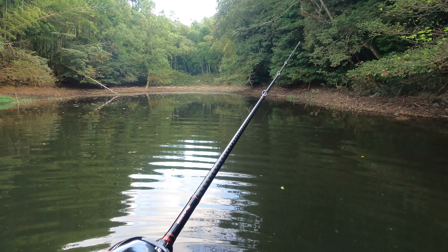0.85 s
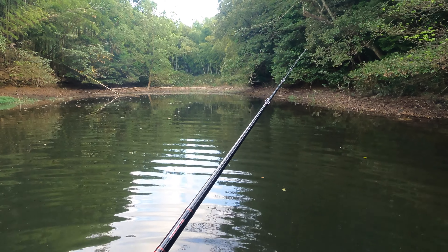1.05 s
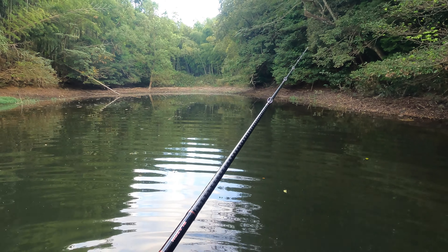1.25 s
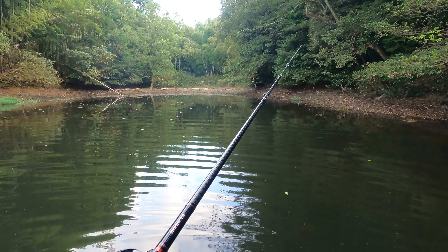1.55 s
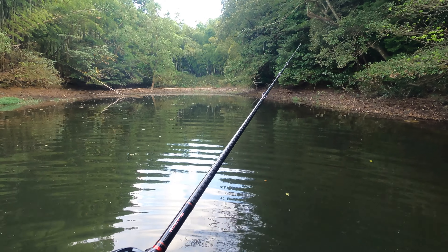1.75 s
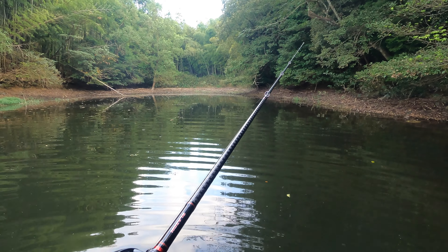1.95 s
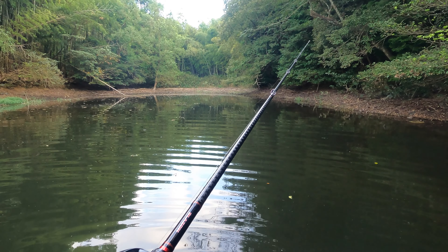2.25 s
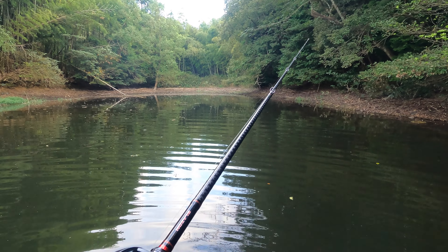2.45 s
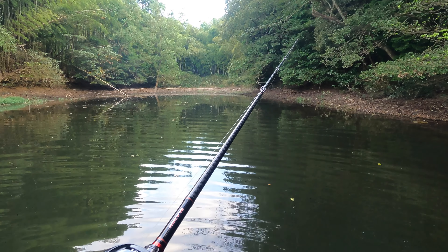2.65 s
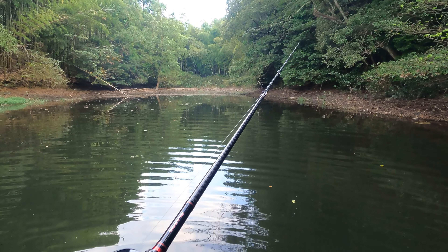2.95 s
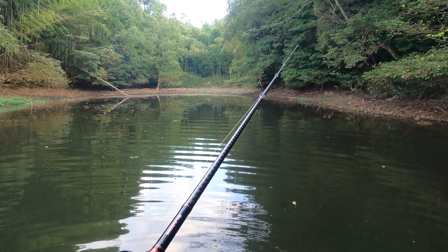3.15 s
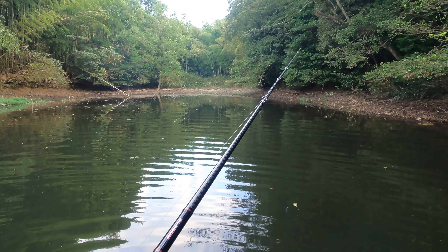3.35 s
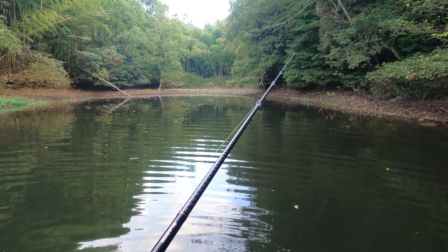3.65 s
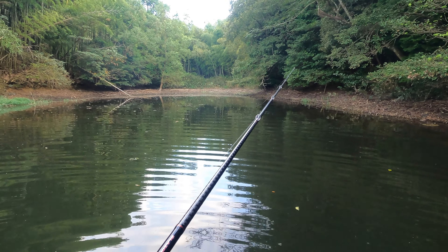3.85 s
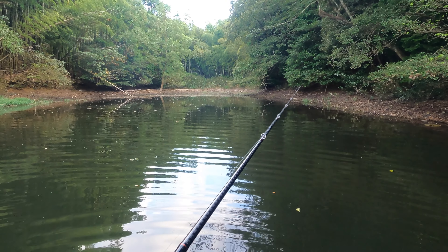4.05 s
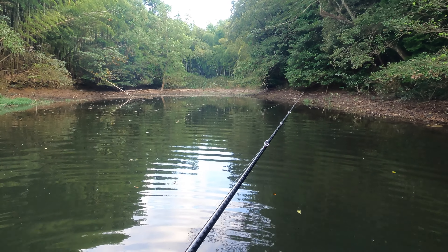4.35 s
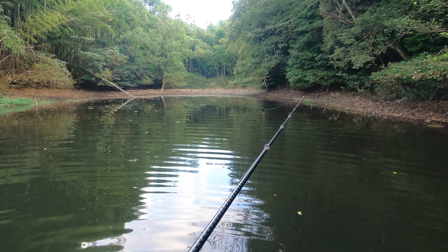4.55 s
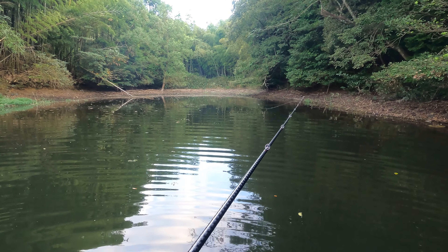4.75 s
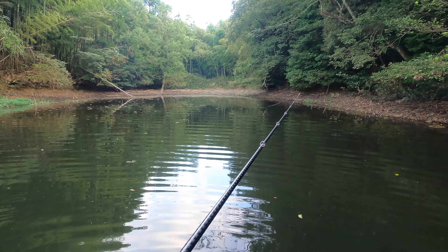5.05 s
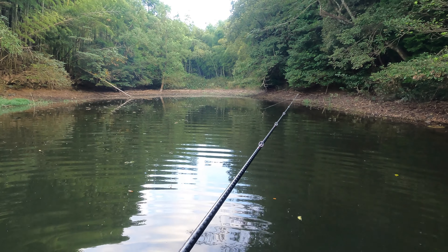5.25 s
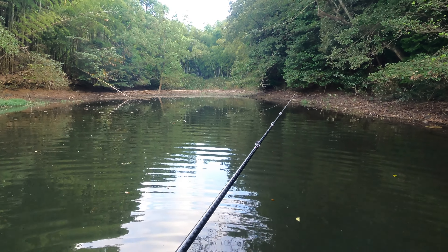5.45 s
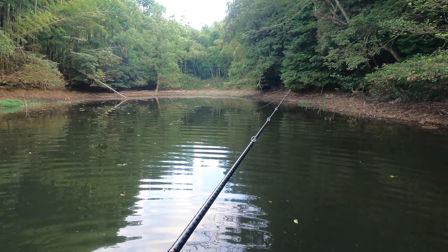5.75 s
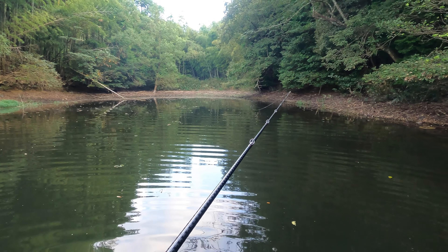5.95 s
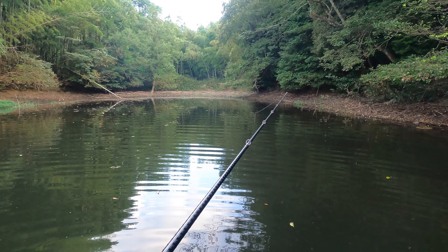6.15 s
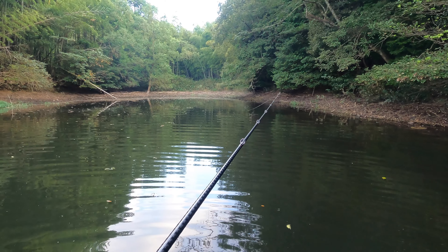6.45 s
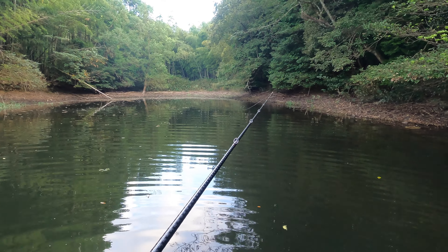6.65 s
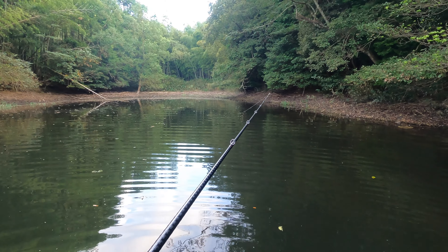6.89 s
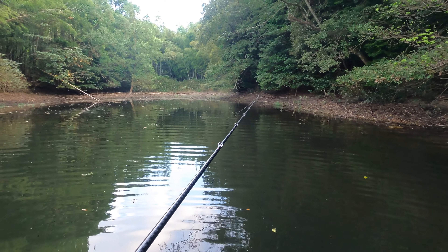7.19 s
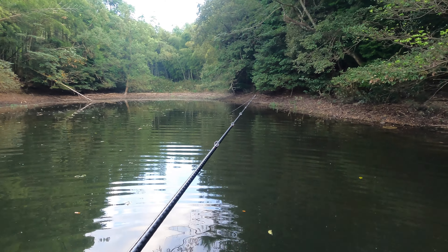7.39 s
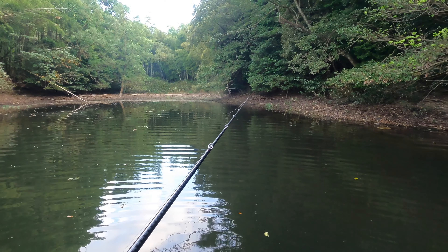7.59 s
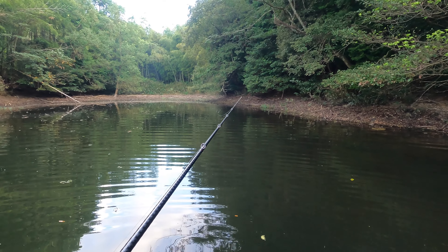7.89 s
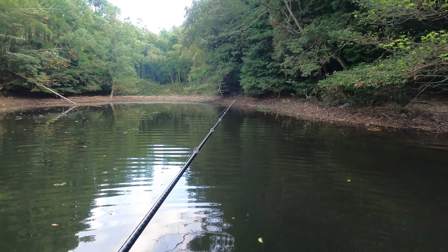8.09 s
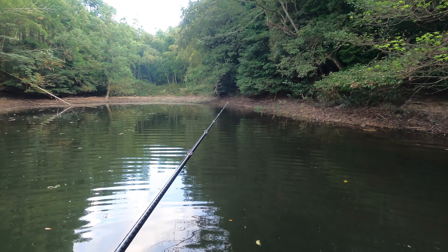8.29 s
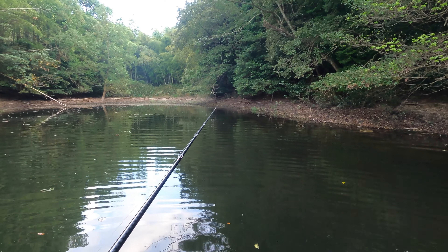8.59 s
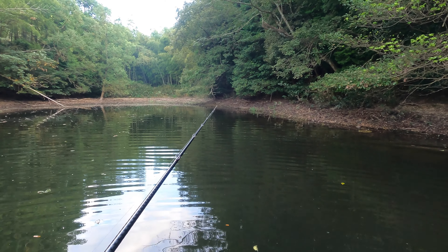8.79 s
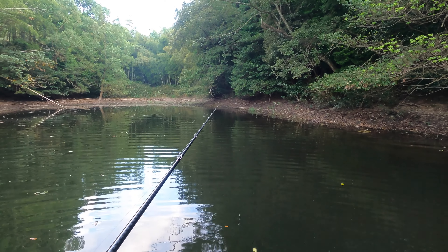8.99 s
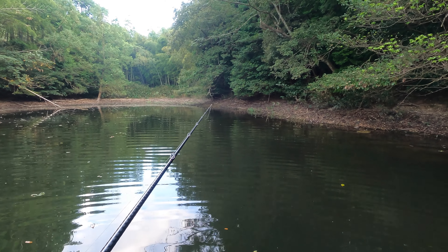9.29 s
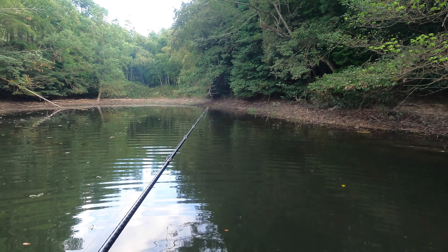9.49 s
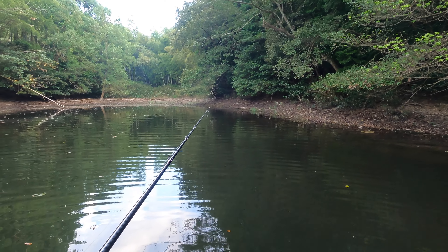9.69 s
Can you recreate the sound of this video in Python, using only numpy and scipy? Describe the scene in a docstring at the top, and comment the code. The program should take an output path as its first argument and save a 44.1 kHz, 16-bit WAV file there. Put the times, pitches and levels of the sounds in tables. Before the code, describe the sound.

Outdoors at a still wooded pond, heard from a stereo microphone beside the tackle. A single bright clack near the start dominates, then everything is quiet: sparse ticking line, delicate ringing plops farther out, and after the middle dry grip creaks with dull low thuds to the left. Thin birdsong, quick falling chirps and hoarse distant cries echo in the trees above a soft steady insect band, low traffic hum and slight wind rumble.

```python
"""Still pond in the woods: a surface lure is wound back. The reel snaps into gear close by as struck, ringing
metal, and scattered echoes return from the trees. The lure's plops are ringing bubbles; wet line ticks and the
creaking, rustling grip are coloured noise bursts. Birds are gliding tones. Insects, traffic, woods and air on
the microphone are coloured noise."""
import sys
import numpy as np
from scipy import signal
from scipy.fft import rfft, irfft, next_fast_len
from scipy.io import wavfile

SR = 44100
rng = np.random.default_rng(int(sys.argv[2]) if len(sys.argv) > 2 else 0)


def to_wav(s):
    """Save 16-bit WAV."""
    ch = np.atleast_2d(s).T  # columns
    pcm = np.round(np.clip(ch, -1, 1) * 32767)  # PCM
    wavfile.write(sys.argv[1], SR, pcm.astype(np.int16))


N = 433503
T = np.arange(N) / SR

# Table levels are relative: layer trims and the microphone ports still act on them.
# clutch strikes and rebounds (time [s], level [dB])
CLACKS = [(.2243, -31), (.2324, -25.5), (.2391, -20), (.2397, -22.5), (.2406, -21), (.2418, -28),
          (.2425, -31), (.2442, -34)]
# lighter gear knocks (time [s], level [dB])
GEARS = [(.068, -52), (.168, -54.5), (.203, -58), (.523, -61), (.602, -48.5), (.605, -52.5), (.654, -60),
         (.835, -64), (1.267, -57.5), (1.781, -63), (2.756, -58.5), (4.046, -56), (4.159, -65), (5.25, -61),
         (5.45, -56), (6.87, -53.5), (8.351, -60.5)]
# housing colour under the clutch (frequency [Hz], gain [dB])
REEL_COLOUR = [(60, -36), (170, -25), (400, -19.5), (650, -10.5), (850, -5), (1250, 1.5), (1700, -6),
               (2500, -0.5), (3400, -2), (4600, 5.5), (5100, 2.5), (5800, 5.5), (6700, 4.5), (8400, -2),
               (10300, -11), (11000, -24), (15000, -33.5)]
# housing colour under the gears (frequency [Hz], gain [dB])
GEAR_COLOUR = [(60, -14), (170, -8), (400, -16), (650, -6), (900, 3.5), (1300, 1), (1750, -3), (2500, -1),
               (3400, -3.5), (5200, 3), (6700, -3), (8400, -9), (11000, -29), (15000, -38.5)]
# ringing of reel and rod (frequency [Hz], level [dB], t60 [s])
REEL_MODES = [(163.5, -26, 0.21), (654, -38, .15), (820, -25, .13), (973, -22.5, 0.17), (1060, -26, 0.09),
              (1330, -17, .02), (1930, -28.5, 0.082), (2500, -16, 0.016), (4670, -9, 0.009),
              (5800, -8.5, 0.012), (6680, -10.5, 0.009)]
# treble-heavy return of the snap from the leaves (frequency [Hz], gain [dB])
THROWN_COLOUR = [(1000, -12.5), (5000, -4.0), (8000, -1.5), (12000, 12.5)]
# tree echo colour (frequency [Hz], gain [dB])
ECHO_COLOUR = [(300, 9.5), (2000, 3.5), (7000, 6.0), (14000, -8.5)]
# gear whirr as the crank turns (time [s], level [dB])
CRANK = [(0, -100), (.55, -73.5), (1.1, -72), (1.5, -70.5), (1.8, -95), (9.83, -96)]
# hollow of the reel (frequency [Hz], gain [dB])
HOLLOW_COLOUR = [(300, -26.0), (650, -6.5), (830, 5.5), (950, 0), (1150, 1.5), (1700, -5), (3000, -18.0),
                 (9000, -38.0)]
# bubbles closed by the lure (time [s], level [dB], starting pitch [Hz], t60 [s])
PLOPS = [(1.597, -61, 2050, 0.042), (1.788, -60, 990, 0.06), (2.201, -59, 2123, 0.011),
         (2.555, -64, 1930, 0.044), (2.605, -63, 1990, 0.027), (2.65, -49.5, 2015, 0.057),
         (3.213, -58, 2160, 0.026), (4.3158, -54, 2360, 0.034), (4.642, -62.5, 2640, 0.03),
         (5.859, -52.5, 2210, 0.035), (6.987, -57.5, 2200, 0.02), (7.0418, -58.5, 2200, 0.031),
         (7.389, -52.5, 1996, 0.055), (8.764, -57, 4500, 0.059), (9.2453, -50, 2010, 0.062)]
# slap of the water (frequency [Hz], gain [dB])
SLAP_COLOUR = [(700, -21), (1900, 14.0), (2600, 2), (5000, -6), (12000, -58)]
# clearest flicks of wet line onto the spool (time [s], level [dB], pitch [Hz])
TICKS = [(1.227, -62, 6350), (1.267, -55, 5920), (1.362, -58, 5910), (2.2535, -64, 7600),
         (2.442, -61.5, 7400), (2.4978, -48.5, 5700), (2.544, -54, 7300), (2.7536, -58.5, 7940),
         (2.869, -65, 8500), (2.91, -57, 8850), (3.1627, -61.5, 7250), (3.217, -66, 8500),
         (3.2628, -58.5, 7500), (3.874, -65, 9050), (4.043, -49.5, 7500), (4.159, -52.5, 5710),
         (4.253, -65, 9460), (4.3704, -60, 8050), (4.623, -59.5, 7500), (4.85, -67, 7940),
         (5.0474, -58, 8360), (5.08, -56.5, 7600), (5.2006, -57, 6700), (5.335, -63, 7500),
         (5.3565, -57, 6900), (5.385, -46.5, 7000), (5.403, -60, 6800), (5.807, -58.5, 6960),
         (6.691, -62, 6500), (6.8686, -65.5, 5550), (7.9825, -60.5, 8300), (8.055, -63, 9000),
         (8.3504, -52, 6200), (8.449, -60.5, 6200), (8.5415, -58.5, 7240), (8.687, -62.5, 8350),
         (8.7652, -58, 8740), (8.959, -62, 7000), (9.128, -63.5, 8000), (9.5513, -63, 6800),
         (9.59, -64, 8400), (9.7282, -55.5, 9300)]
# stick-slip creaks of the grip (time [s], level [dB])
CREAKS = [(5.716, -48.5), (5.757, -47), (5.799, -48), (5.875, -42.5), (5.894, -53), (5.912, -46),
          (5.929, -46), (5.951, -53), (6.047, -53.5), (6.134, -52.5), (6.416, -43.5), (6.441, -46),
          (6.467, -44.5), (6.496, -53), (6.518, -43), (6.536, -45), (6.773, -50), (6.892, -53.5),
          (7.491, -49.5), (7.52, -52), (7.56, -52), (7.604, -53), (7.664, -52.5), (8.083, -48)]
# creak and bump scuff colour (frequency [Hz], gain [dB])
CREAK_COLOUR = [(80, 1), (200, 4.5), (440, 5.5), (660, -16.5), (900, -7.5), (1500, -13), (3000, -19.5),
                (8000, -33.5), (14000, -93)]
# soft bumps of the hand (time [s], level [dB], pitch [Hz])
BUMPS = [(3.927, -51.5, 167), (3.956, -57, 162), (4.845, -58.5, 150), (5.912, -51.5, 186),
         (6.595, -45, 215), (6.648, -49, 206), (6.969, -45.5, 185), (7.022, -49, 210), (7.09, -48.5, 192),
         (7.599, -45.5, 201), (7.921, -55.5, 187), (8.012, -52.5, 153), (8.084, -53, 149)]
# hand shifting on the grip (time [s], level [dB])
RUSTLE = [(0, -100), (5.3, -96), (5.5, -64.5), (5.72, -62), (5.93, -58.5), (6.15, -76), (6.38, -85),
          (6.5, -60), (6.7, -62), (6.85, -72), (7.0, -58), (7.2, -76), (7.45, -76), (7.58, -72),
          (7.75, -85), (8.05, -61.5), (8.25, -83), (8.65, -65), (9.1, -84), (9.83, -79)]
# rustle colour (frequency [Hz], gain [dB])
RUSTLE_COLOUR = [(80, 0.5), (200, 3.5), (440, -6.5), (660, -15.5), (900, -15), (1500, -17), (3000, -18),
                 (8000, -29), (14000, -76.5)]
# small bird's falling three-note phrases (time [s], level [dB], pitch fallen to [Hz])
PHRASES = [(-.04, -63.5, 5670), (0.457, -61.5, 5630), (.95, -62.5, 5800), (2.056, -59, 5950),
           (3.907, -58, 5580), (5.385, -60, 5360), (7.427, -62, 5730), (7.895, -59.5, 5600)]
# thin whistle, buzzing trill, lower hook (delay [s], length [s], share of the fall [0-1], level [dB])
SONG_NOTES = [(0.003, 0.1, 0.053, -15.5), (0.138, 0.16, .4, -8), (0.257, .07, 1, 1)]
# same three notes (pitch contour [ratio], buzz [ratio])
SONG_SHAPES = [([.975, .995, 1, .992], .007),
               ([.95, 1.04, .96, .99], .035),
               ([.86, .955, .97, 1.01, .98, .94], .018)]
# second bird's quick falling chirps (time [s], level [dB])
CHIRPS = [(0.133, -56), (.955, -62), (1.028, -55.5), (1.59, -59.5), (1.672, -56), (2.03, -57), (2.575, -53),
          (2.649, -49), (4.36, -54.5), (4.424, -49), (4.589, -49.5), (4.759, -53), (5.114, -59),
          (6.648, -54.5), (6.721, -55), (7.344, -56.5), (7.581, -57.5), (7.744, -55.5), (7.869, -53.5),
          (9.276, -61), (9.786, -52)]
# larger bird's gliding calls, deep in the trees (time [s], length [s], first [Hz], last [Hz], level [dB])
CRIES = [(5.17, 0.018, 2750, 4230, -61), (5.413, 0.036, 1693, 5480, -58.5), (5.447, 0.072, 4180, 3920, -54),
         (5.504, 0.077, 3670, 2730, -61), (5.665, 0.025, 5100, 5540, -65), (5.688, 0.065, 5400, 4860, -62),
         (5.742, 0.081, 5480, 6950, -65), (5.798, 0.062, 7040, 6860, -63), (5.832, .065, 4870, 1995, -60.5),
         (5.901, 0.054, 2100, 5680, -58.5), (5.968, .065, 5640, 3440, -59.5),
         (6.211, 0.095, 6560, 6620, -71.5), (6.407, 0.08, 3125, 5230, -53.5),
         (6.482, 0.064, 5174, 5030, -59.5), (6.518, 0.081, 5080, 3290, -61), (6.711, 0.08, 4710, 7170, -66),
         (8.202, 0.098, 4080, 4850, -58), (8.293, 0.035, 4300, 2470, -58.5),
         (8.321, 0.071, 2500, 2260, -65.5)]
# rasp of the cries (frequency [Hz], gain [dB])
RASP_COLOUR = [(100, 4.5), (700, 3), (2200, -10.5), (4500, -40)]
# insect chorus (time [s], level [dB])
INSECTS = [(0, -64.5), (1.5, -68), (3, -65), (4.5, -64), (6, -63), (7.3, -65), (8.7, -62), (9.83, -64)]
# chorus colour (frequency [Hz], gain [dB])
INSECT_COLOUR = [(2800, -65), (3450, -7.5), (3850, 6), (4250, 7.5), (4520, 8.5), (4680, 1.5), (4900, -4),
                 (5500, -68.5)]
# tyres on a far road (time [s], centre [Hz], level [dB])
ROAD = [(0, 1174, -74.5), (1.5, 1156, -65.5), (3, 1180, -68.5), (5.4, 1229, -73.5), (6, 1271, -64.5),
        (6.7, 1261, -63.5), (7.7, 1231, -65), (8.6, 1210, -66), (9.3, 1255, -64.5), (9.83, 1238, -73)]
# low hum of far traffic (time [s], level [dB])
HUM = [(0, -65), (1.2, -66.5), (2.6, -65.5), (3.4, -62), (4.4, -63), (5.2, -66), (6.3, -64.5), (7.6, -62),
       (8.7, -66.5), (9.3, -62), (9.83, -64.5)]
# hum colour (frequency [Hz], gain [dB])
HUM_COLOUR = [(50, -33.5), (105, -24), (145, -2.5), (185, 0.5), (255, -8), (340, -14), (520, -26.5),
              (1000, -58)]
# hush of the woods (frequency [Hz], gain [dB])
WOODS_COLOUR = [(40, -11), (100, -15.5), (180, -12), (300, -15), (550, -17), (800, -17.5), (1250, -12.5),
                (2000, -18.5), (3000, -21), (4600, -20.5), (6400, -18.5), (8200, -30.5), (10500, -39.5),
                (12800, -44.5), (14000, -68.5)]
# slow air on the microphone (time [s], level [dB])
AIR = [(0, -63), (.3, -65), (.7, -70.5), (1.25, -69), (1.55, -76), (1.85, -69), (2.5, -69.5), (2.87, -69),
       (3.4, -73), (3.8, -63.5), (4.35, -74.5), (4.85, -70.5), (5.3, -65), (5.9, -68.5), (6.3, -68.5),
       (7.85, -73.5), (8.25, -67.5), (9, -73.5), (9.83, -64)]
# soft low thumps of air (time [s], length [s], level [dB])
THUMPS = [(0.184, .015, -61), (.43, 0.028, -51), (0.616, .015, -55), (1.231, 0.018, -57), (1.86, .04, -60),
          (2.87, .05, -59), (8.044, 0.074, -45.5), (9.712, 0.056, -56.5)]
# rumble colour of air, thumps and shake (frequency [Hz], gain [dB])
RUMBLE_COLOUR = [(8, -11), (28, 5.5), (45, 2.5), (90, -8.5), (200, -32.5), (1000, -71.5)]
# microphone port mismatch (frequency [Hz], left minus right [dB])
PORTS = [(60, 0), (190, 0), (380, 3), (700, 2), (1250, 0), (2400, 1.2), (4400, 0), (7500, 0.3), (9300, 4),
         (12500, -2.5)]

TICK_HZ, TICK_SPREAD = 7080, 0.091  # centre and relative scatter of the fainter ticks
LINE_PAN_DB, GRIP_PAN_DB, HUM_PAN_DB, SHAKE_PAN_DB = 1, 6.5, 2.5, -2  # left minus right
GRIP_SIDE_DB = -2  # rustle that differs between the microphones
SONG_TOP_HZ = 8520
CHIRP_HZ, CHIRP_USUAL_DB, CHIRP_HZ_PER_DB, CHIRP_END_HZ = 3740, -56, 59.5, 2750
CRY_ARCH = 1.02  # upward bow in mid-glide [ratio]
CRICKET_HZ, CRICKET_DB, CRICKET_PULSE_HZ = 4517, -73, 16
WOODS_DB, WOODS_SWELL_DB = -65.5, 1.1
AIR_DB, AIR_SIDE_DB, AIR_GUST_DB, AIR_GUSTS_PER_S = 1, -15.5, 3, 4.9
SHAKE_DB, SHAKE_SIDE_DB, SHAKE_RISE_S, SHAKE_T60_S = -0.5, -6, 0.019, 0.3  # SHAKE_DB is against the bump
TOP_HZ = 15500
SIDES = np.array([[1], [-1]])  # sign of a side signal, left and right


def undb(db):
    """Decibels to gain."""
    return 10 ** (np.asarray(db) / 20)


def level(x, db):
    """Set a steady sound's rms level."""
    return x * undb(db) / np.sqrt(np.mean(x ** 2))


def burst(x, db, size=220):
    """Scale a short sound by its energy, as if packed into size samples (220 is 5 ms)."""
    return x * undb(db) * np.sqrt(size / np.sum(x ** 2))


def curves(table):
    """Each column of a table, joined by straight lines in time."""
    s, *columns = np.transpose(table)
    return [np.interp(T, s, c) for c in columns]


def fade(t, t60):
    """Exponential decay by 60 dB in t60 seconds."""
    return np.exp(-np.log(1000) * t / t60)


def add(track, s, x):
    """Mix a short sound in at a time."""
    i = max(int(s * SR), 0)
    track[i:i + len(x)] += x[:max(N - i, 0)]


def colour(x, points):
    """Causal minimum-phase filter through (Hz, dB) points, by folding the cepstrum."""
    size = next_fast_len(x.shape[-1] + 2048) // 2 * 2
    hz, db = np.transpose(points)
    bin_hz = np.arange(size // 2 + 1) * SR / size
    log_gain = np.log(undb(np.interp(np.log(bin_hz + 1), np.log(hz), db)))
    cepstrum = irfft(log_gain)
    cepstrum[1:size // 2] *= 2
    cepstrum[size // 2 + 1:] = 0
    return irfft(rfft(x, size) * np.exp(rfft(cepstrum)))[..., :x.shape[-1]]


def walk(rate, size=N):
    """Random wandering, rate knots per second, with a spread near 1."""
    place = np.arange(size) * rate / SR
    knots = rng.standard_normal(int(place[-1]) + 2)
    return 1.2 * np.interp(place, np.arange(len(knots)), knots)


def band(hz, width_hz):
    """Narrow noise around a moving centre, at 0 dB rms."""
    phase = 2 * np.pi * np.cumsum(hz) / SR
    sos = signal.butter(2, np.clip(width_hz / 2, 1, SR / 4), fs=SR, output="sos")
    a, b = signal.sosfilt(sos, rng.standard_normal((2, N)))
    return level(a * np.cos(phase) + b * np.sin(phase), 0)


def pan(x, left_db):
    """Place a sound by its left minus right level."""
    return x * undb(np.array([[left_db], [-left_db]]) / 2)


def wide(points, side_db):
    """Coloured noise that arrives from all around, at 0 dB rms."""
    mid, side = colour(rng.standard_normal((2, N)), points)
    return level(mid + undb(side_db) * side * SIDES, 0)


def snap(t60, grit, size=2048):
    """A sharp contact followed by a brief rattle."""
    x = grit * rng.standard_normal(size) * fade(T[:size], t60)
    x[0] += 1
    return x


def reel(rattle_s=0.011, clack_db=1.0, gear_db=0, ring_db=-4, side_db=-10.0):
    """Clutch and gears strike the housing, which rattles and rings briefly together with the rod."""
    mid, side, t = np.zeros(N), np.zeros(N), T[:8192]
    ring = sum(undb(db) * np.sin(2 * np.pi * hz * t) * fade(t, t60) for hz, db, t60 in REEL_MODES)
    ring = signal.sosfilt(signal.butter(2, 130, "high", fs=SR, output="sos"), ring)
    for table, body, gain_db in ((CLACKS, REEL_COLOUR, clack_db), (GEARS, GEAR_COLOUR, gear_db)):
        for s, db in table:
            crack = snap(t60=rattle_s, grit=0.38, size=len(t))
            crack += undb(-31) * snap(t60=0.055, grit=1, size=len(t))
            add(mid, s, burst(colour(crack, body), db + gain_db) + undb(db + ring_db) * ring)
            # so close, the two microphones hear different faces of the housing
            face = snap(t60=rattle_s, grit=0.93)
            add(side, s, burst(colour(face, body), db + side_db))
    return mid + side * SIDES


def trees(x, db, t60, delay, swell):
    """Scattered echoes from the wooded banks come late, build up gradually and arrive in clumps."""
    t = T[:SR]
    clumps = undb(4 * walk(70, size=SR))
    arrival = np.clip((t - delay) / swell, 0, 1) * fade(t, t60) * clumps
    mid, side = colour(rng.standard_normal((2, SR)) * arrival, ECHO_COLOUR)
    echo = burst(mid + 0.34 * side * SIDES, db, size=2)  # one unit of energy per channel on average
    return signal.fftconvolve(x[None], echo, axes=1)[:, :N]


def crank(teeth_hz=60, scatter_db=6):
    """Gear teeth tap unevenly into the hollow of the reel."""
    db, = curves(CRANK)
    strength = undb(np.clip(scatter_db * rng.standard_normal(N), -12, 8))
    taps = (rng.random(N) < teeth_hz / SR) * strength
    hiss = .02 * rng.standard_normal(N)
    return level(colour(taps + hiss, HOLLOW_COLOUR), 0) * undb(db)


def lure(rise=0.022, bubble_db=6.5, splash_db=-10):
    """Each pocket of air rings as a bubble, rising a little in pitch, with a tiny slap at its start."""
    out, t = np.zeros(N), T[:6000]
    for s, db, hz, t60 in PLOPS:
        phase = 2 * np.pi * np.cumsum(hz * (1 + rise * t / t60)) / SR
        bubble = np.sin(phase) * fade(t, t60) * undb(2 * walk(340, size=len(t)))
        add(out, s, undb(db + bubble_db) * bubble)
        slap = colour(snap(t60=0.022, grit=0.51), SLAP_COLOUR)
        add(out, s, burst(slap, db + splash_db))
    return out


def line(tick_db=-2, faint_db=-76, scatter_db=4, count=80):
    """Wet line ticks as it is wound in, with many fainter droplets between."""
    out = np.zeros(N)
    chance = rng.standard_normal((count, 2))
    times_s = rng.uniform(0, N / SR, count)
    levels_db = faint_db + scatter_db * np.minimum(chance[:, 0], 2)
    pitches_hz = TICK_HZ * np.exp(TICK_SPREAD * chance[:, 1])
    for s, db, hz in TICKS + list(zip(times_s, levels_db, pitches_hz)):
        hz = min(hz, 9500)
        # nothing resonates below the pitch of so small a thing
        shape = [(1000, -30), (0.45 * hz, -21), (0.81 * hz, -3), (hz, 0), (10500, -6), (12000, -16), (15000, -31)]
        add(out, s, burst(colour(snap(t60=0.012, grit=0.075), shape), db + tick_db))
    return out


def grip(bump_width=0.65, creak_db=-4.0, bump_db=7.0, scuff_db=-7):
    """The hand creaks on the grip and bumps it: a short dull pulse, a weaker dying tail and a scuff."""
    out, t = np.zeros(N), T[:3000]
    for s, db in CREAKS:
        add(out, s, burst(colour(snap(t60=0.023, grit=0.85), CREAK_COLOUR), db + creak_db))
    for s, db, hz in BUMPS:
        cycles = t * hz - 2
        pulse = np.exp(-(cycles / bump_width) ** 2)
        tail = 0.32 * (cycles > 0) * fade(t, 0.086)
        thud = np.sin(2 * np.pi * cycles) * (pulse + tail)
        add(out, s + 0.0031 - 2 / hz, burst(thud, db + bump_db))
        add(out, s, burst(colour(snap(t60=0.031, grit=0.62), CREAK_COLOUR), db + scuff_db))
    return out


def rustle(patchy_db=3):
    """Skin drags over the grip in small uneven slips."""
    db, = curves(RUSTLE)
    return level(colour(rng.standard_normal(N), RUSTLE_COLOUR), 0) * undb(db + patchy_db * walk(120))


def note(length, contour, buzz, buzz_hz=85, overtone_db=-22):
    """A bird's near-pure tone follows a pitch contour, with flutter in pitch and strength."""
    u = np.linspace(0, 1, max(int(length * SR), 64))
    hz = np.interp(u, np.linspace(0, 1, len(contour)), contour)
    flutter = .5 * np.sin(2 * np.pi * buzz_hz * length * u) + .7 * walk(300, size=len(u))
    phase = 2 * np.pi * np.cumsum(hz * (1 + buzz * flutter)) / SR
    # only the lower notes carry an octave
    tone = np.sin(phase) + undb(overtone_db) * (max(contour) < 4500) * np.sin(2 * phase)
    swell = np.sqrt(np.clip(4 * u * (1 - u), 0, 1))
    return tone * swell * undb(2.9 * walk(150, size=len(u)))


def through_leaves(x):
    """Paths through the leaves cancel and add, so the notes arrive broken."""
    return x * undb(3.5 * walk(260) - 1)


def small_bird(song_db=2.5):
    """A small bird sings whistle, trill and arched hook, each lower than the last."""
    out = np.zeros(N)
    for s, db, low_hz in PHRASES:
        for (delay, length, fall, note_db), (contour, buzz) in zip(SONG_NOTES, SONG_SHAPES):
            hz = SONG_TOP_HZ + fall * (low_hz - SONG_TOP_HZ)
            tone = note(length, hz * np.array(contour), buzz)
            add(out, s + delay, undb(db + note_db + song_db) * tone)
    return through_leaves(out)


def chirper(chirp_db=-4.5, chirp_s=0.033):
    """A second bird gives short downward chirps; louder ones start higher."""
    out = np.zeros(N)
    for s, db in CHIRPS:
        hz = CHIRP_HZ + CHIRP_HZ_PER_DB * (db - CHIRP_USUAL_DB)
        contour = [hz, 1.02 * (hz + CHIRP_END_HZ) / 2, CHIRP_END_HZ]
        add(out, s, undb(db + chirp_db) * note(chirp_s, contour, buzz=0.014, overtone_db=-15))
    return through_leaves(out)


def far_bird(hoarse_db=-4, upper_share=0.39):
    """Hoarse cries glide up and down; noise modulation adds the rasp."""
    out = np.zeros(N)
    for s, length, first, last, db in CRIES:
        contour = [first, CRY_ARCH * (first + last) / 2, last]
        add(out, s, undb(db) * note(length, contour, buzz=.014))
    # the rasp spreads each cry mostly below its pitch and leaves the upper edge firm
    rasp = signal.hilbert(level(colour(rng.standard_normal(N), RASP_COLOUR), hoarse_db))
    spread = np.conj(rasp) + upper_share * rasp
    return out + np.real(signal.hilbert(out) * spread) / np.sqrt(2)


def cricket(width_hz=90, unevenness=.04):
    """One insect stands out of the chorus with a pulsing trill of narrow noise."""
    phase = 2 * np.pi * np.cumsum(CRICKET_PULSE_HZ * (1 + unevenness * walk(12))) / SR
    return level(band(np.full(N, 1. * CRICKET_HZ), width_hz) * (1 + np.sin(phase)) ** 2, CRICKET_DB)


def insects():
    """Many insects merge into one flickering band of noise."""
    db, = curves(INSECTS)
    flicker_db = .5 * walk(26) + 1.0 * walk(90)
    return pan(wide(INSECT_COLOUR, side_db=-11.0) * undb(db - 0.37 + flicker_db), -.5)


def road():
    """Far tyres hiss in a narrow band of drifting pitch."""
    hz, db = curves(ROAD)
    mid, side = band(hz, width_hz=240), band(hz, width_hz=360)
    return (mid + 0.73 * side * SIDES) * undb(db - 6.5)


def hum():
    """Far traffic hums as low noise with a wandering level."""
    db, = curves(HUM)
    return pan(wide(HUM_COLOUR, side_db=-6), HUM_PAN_DB) * undb(db + 1.6 * walk(7.3))


def woods():
    """The hush of the woods is broad noise that swells slightly."""
    return wide(WOODS_COLOUR, side_db=-5.0) * undb(WOODS_DB + WOODS_SWELL_DB * walk(5.5))


def rumble():
    """Low rumble on the microphone: wandering air, soft thumps, and a shake that dies away after each bump."""
    air_db, = curves(AIR)
    air = wide(RUMBLE_COLOUR, AIR_SIDE_DB) * undb(air_db + AIR_DB + AIR_GUST_DB * walk(AIR_GUSTS_PER_S))
    power = sum((undb(db) * np.exp(-((T - s) / length) ** 2)) ** 2 for s, length, db in THUMPS)
    for s, db, _ in BUMPS:
        rise = np.clip(1 + (T - s) / SHAKE_RISE_S, 0, 1)
        shake = rise * fade(np.clip(T - s, 0, 2), SHAKE_T60_S)
        power = power + (undb(db + SHAKE_DB) * shake) ** 2
    return air + pan(wide(RUMBLE_COLOUR, SHAKE_SIDE_DB) * np.sqrt(power), SHAKE_PAN_DB)


def scene():
    """Near sounds of the tackle, the lure out on the water, and the woods around."""
    clack, plops = reel(), lure()
    song, chirps, cries = small_bird(), chirper(), far_bird()
    hand = pan(grip() + rustle(), GRIP_PAN_DB) + undb(GRIP_SIDE_DB) * rustle() * SIDES
    near = pan(clack, 1.1) + pan(line(), LINE_PAN_DB) + pan(crank(), .3) + hand
    far = pan(undb(-2.5) * (song + chirps) + undb(-3) * cries + plops, 1)
    # leaves throw back mostly the treble of the reel's snap
    thrown = colour(clack[0], THROWN_COLOUR)
    echoes = trees(thrown, db=-33.5, t60=0.71, delay=0.039, swell=0.034)
    # the deeper in the woods, the more of a sound is echo; open water gives little
    echoes += trees(cries, db=-0.5, t60=0.98, delay=0.005, swell=0.022)
    echoes += trees(song, db=-5.5, t60=0.6, delay=0.0071, swell=.015)
    echoes += trees(chirps, db=-10, t60=0.6, delay=0.015, swell=.04)
    echoes += trees(plops, db=-37, t60=.4, delay=.01, swell=0.022)
    background = pan(cricket(), -.5) + insects() + road() + hum() + woods() + rumble()
    return near + far + echoes + background


def record(dry):
    """Each microphone port adds its own colour; the recorder cuts the top of the treble."""
    ports = [colour(x, [(hz, sign * db / 2) for hz, db in PORTS]) for x, sign in zip(dry, (1, -1))]
    return signal.sosfilt(signal.ellip(8, .2, 70, TOP_HZ, fs=SR, output="sos"), np.array(ports))


dry = scene()
out = record(dry)
to_wav(out)
```